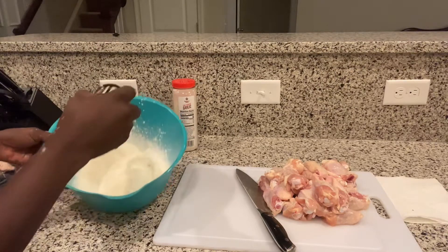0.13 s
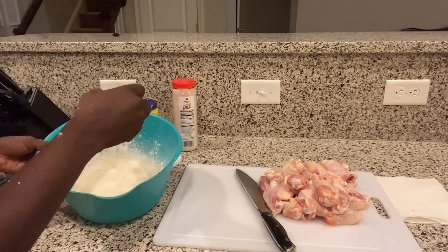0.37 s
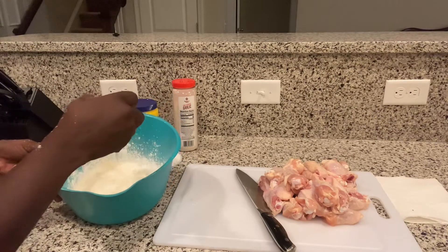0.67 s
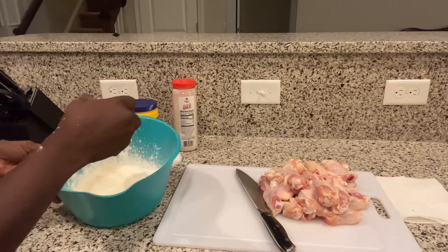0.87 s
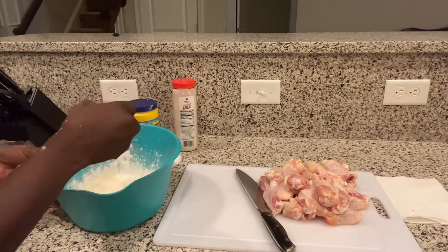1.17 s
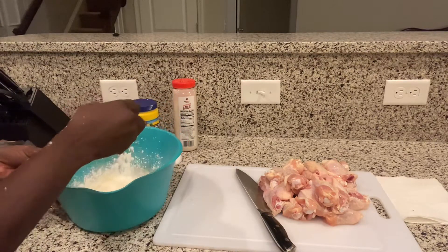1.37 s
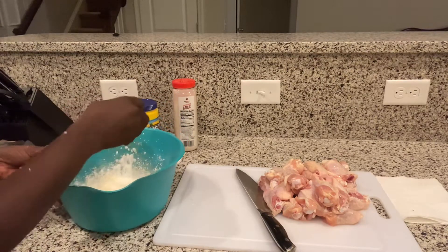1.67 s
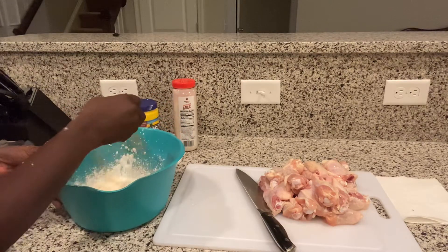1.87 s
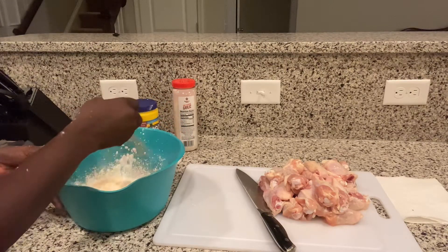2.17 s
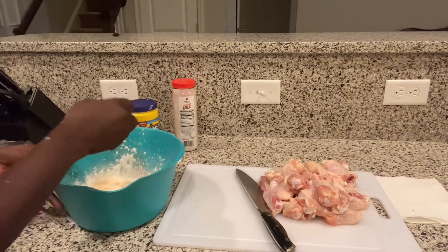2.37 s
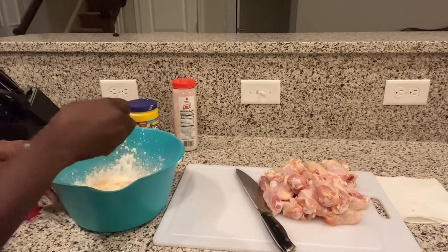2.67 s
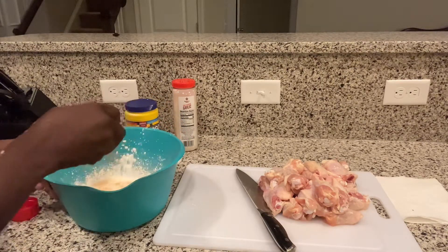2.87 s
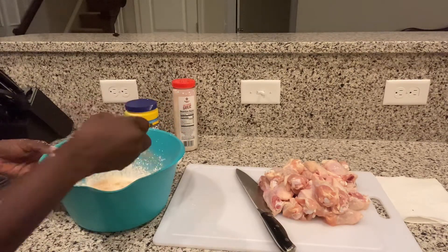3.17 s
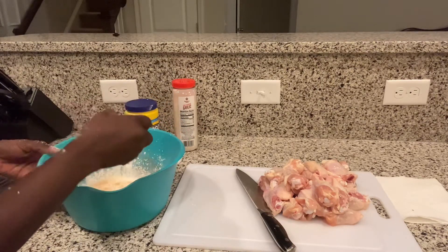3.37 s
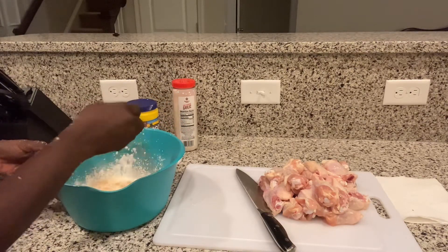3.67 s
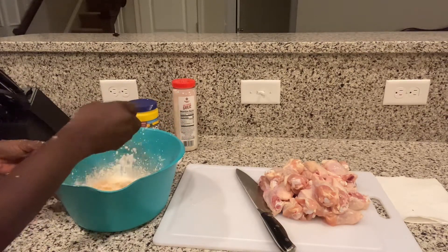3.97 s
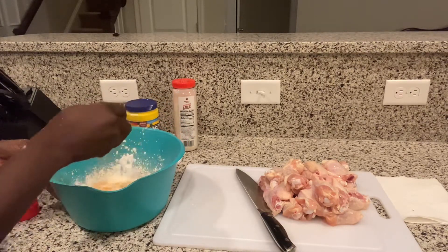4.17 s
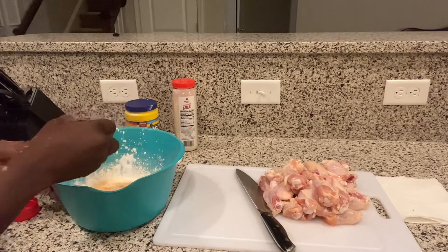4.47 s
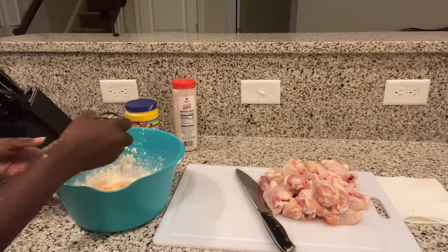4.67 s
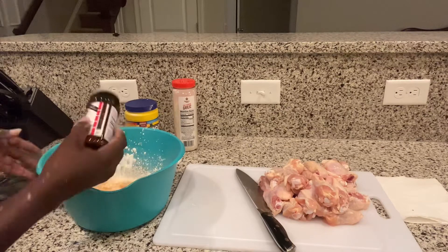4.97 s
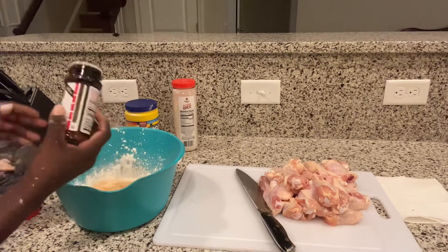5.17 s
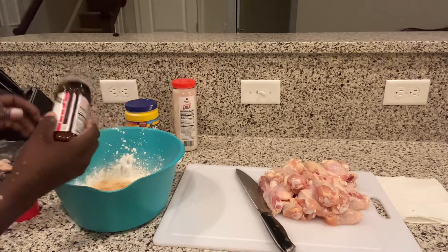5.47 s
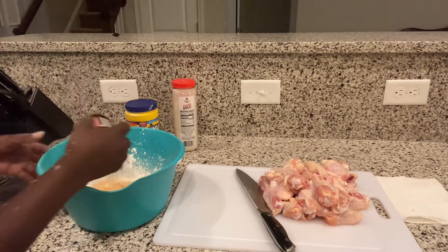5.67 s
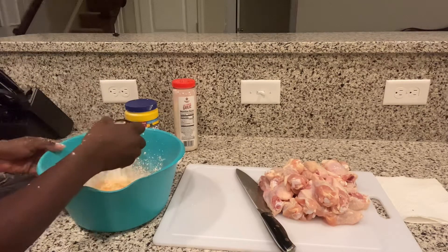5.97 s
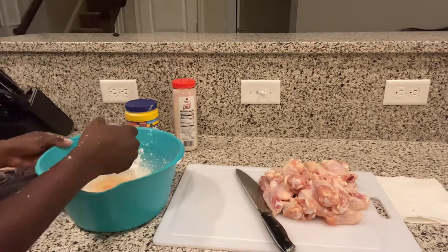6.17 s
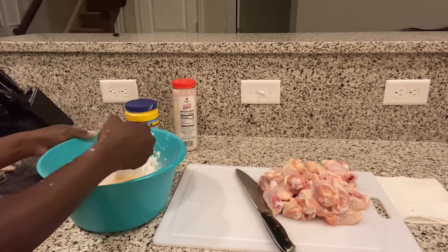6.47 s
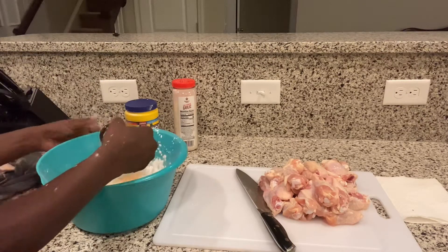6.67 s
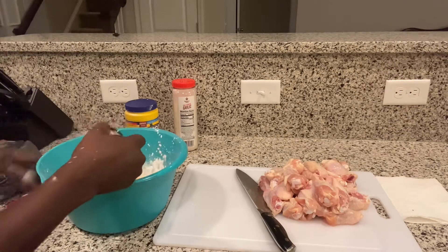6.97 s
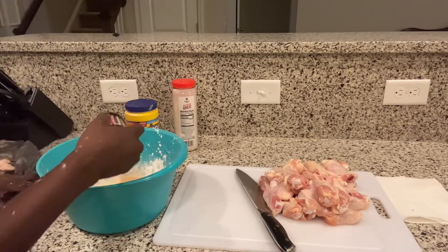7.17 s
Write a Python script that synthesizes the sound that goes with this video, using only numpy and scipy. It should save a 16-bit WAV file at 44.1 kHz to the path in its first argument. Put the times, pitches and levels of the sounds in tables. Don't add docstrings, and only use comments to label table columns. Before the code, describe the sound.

In a quiet kitchen with a low humming fan, a plastic bowl lands on a stone counter with a sharp hollow knock, rocks and skids to rest. Faint, dry shakes of seasoning follow, grains ticking on plastic and fizzing softly. Late on, the bowl is dragged in short scraping jerks, then a few more shakes. Close stereo microphone on the counter.

```python
import sys
import numpy as np
from scipy import signal
from scipy.fft import rfft, irfft, next_fast_len
from scipy.io import wavfile
from scipy.ndimage import uniform_filter1d

SR = 44100
rng = np.random.default_rng(int(sys.argv[2]) if len(sys.argv) > 2 else 0)


def dump(signal):
    limited = np.clip(np.atleast_2d(signal).T, -1, 1)
    pcm = np.round(limited * 32767).astype(np.int16)
    wavfile.write(sys.argv[1], SR, pcm)


def rack_gain(trim_db):
    fader = np.asarray(trim_db, float)
    return 10 ** (fader / 20)


N = 323329


def evened(x):
    return x / np.sqrt(np.mean(x ** 2) + 1e-20)


def smoothed(x, size):
    return uniform_filter1d(uniform_filter1d(x, size=size), size=size)


def read(points, hz):
    f, value = np.transpose(points)
    return np.interp(np.log(hz + 1), np.log(f + 1), value)


def peaks_db(modes, hz):
    return sum(db / (1 + (2 * (hz - f) / width) ** 2) for f, width, db in modes)


def port_gains(lead, balance, hz):
    half = np.exp(.5j * np.interp(hz, *np.transpose(lead))) * rack_gain(read(balance, hz) / 2)
    return np.array([half, 1 / half])


def ports(x, lead, balance):
    size = next_fast_len(N + 4096)
    hz = np.fft.rfftfreq(size, 1 / SR)
    return irfft(rfft(x, size) * port_gains(lead, balance, hz), size)[:, :N]


def resonate(x, hz, width):
    turn = np.exp(2j * np.pi * np.cumsum(hz * np.ones(len(x))) / SR)
    r = np.exp(-np.pi * width / SR)
    return 2 * (turn * signal.lfilter([(1 - r) ** 2], [1, -2 * r, r * r], x / turn)).real


def body(x, modes):
    return evened(sum((-1) ** k * rack_gain(db) * resonate(x, hz, w) for k, (hz, w, db) in enumerate(modes)))


def ringing(modes, t):
    return sum(rack_gain(db - 60 * t / t60) * np.sin(2 * np.pi * hz * t) for hz, db, t60 in modes)


def grains(per_s, spread_db):
    chance, size, sign = rng.random(N), rng.exponential(1, N), rng.choice([-1., 1.], N)
    return evened(sign * rack_gain(spread_db * np.minimum(size, 4)) * (chance < per_s / SR))


def strokes(rows, rise, fall):
    t = np.arange(0, N + 64, 32) / SR
    s, length, start_db, end_db = np.transpose(rows)[..., None]
    db = start_db + (end_db - start_db) * np.clip((t - s) / np.maximum(length, 1e-3), 0, 1)
    db -= rise * np.maximum(s - t, 0) + fall * np.maximum(t - s - length, 0)
    return np.interp(np.arange(N) / SR, t, rack_gain(db).sum(0))


# f/Hz, level/dB per Hz
FAN_SPECTRUM = [(25, -31), (88, -14.5), (146, -9), (211, -19), (276, -15), (553, -16.5), (894, -27),
                (2800, -50.5), (5000, -47.5), (8640, -52), (10300, -57), (12000, -61.5), (13650, -58.5),
                (13900, -75.5)]
# f/Hz, width/Hz, level/dB
ROOM_MODES = [(61.7, 31, 12.5), (122.15, 7.8, 11.5), (180.3, 68, 8.5), (201, 19, 5), (270.3, 63.4, 14),
              (369, 36, 8), (392.3, 12.8, 8), (913, 64, 5.5), (1216, 26, 12.5)]
# f/Hz, width/Hz, level/dB
HOUSING = (3460, 250, 8)
# f/Hz, likeness [0-1]
FAN_LIKENESS = [(30, 1), (140, 0.9), (300, 0.78), (700, 0.667), (1500, 0.39), (4000, 0.074), (8000, 0.14),
                (14000, 0.489)]
# f/Hz, lead/rad
FAN_LEAD = [(0, 0), (340, 0.8), (600, 2.6), (1030, 2.5), (1290, 3.2), (3450, -0.6), (3700, 0.3),
            (6630, 5.3), (8790, 6.8), (9820, 9.4), (10900, 9.4), (12200, 12.4), (13700, 12.6),
            (14500, 13.4)]
# f/Hz, left minus right/dB
FAN_BALANCE = [(60, 3), (180, -1), (540, -2), (1600, -0.5), (4780, 2), (14300, -1)]


def air():
    level_db, patchy_db = -51.5, 1.3
    frames, hz = N // 1024 + 5, np.fft.rfftfreq(4096, 1 / SR)
    a, b, c, d, patches = rng.standard_normal((frames, 2049, 5)).T
    patches = evened(uniform_filter1d(uniform_filter1d(patches, size=30, axis=0), size=4, axis=1))
    same = np.clip(read(FAN_LIKENESS, hz), 0, 1)[:, None]
    left = a + 1j * b
    right = same * left + np.sqrt(1 - same ** 2) * (c + 1j * d)
    colour_db = read(FAN_SPECTRUM, hz) + peaks_db(ROOM_MODES + [HOUSING], hz)
    z = np.array([left, right]) * port_gains(FAN_LEAD, FAN_BALANCE, hz)[..., None]
    z *= rack_gain(colour_db[:, None] + patchy_db * patches)
    return rack_gain(level_db) * evened(signal.istft(z, nperseg=4096, noverlap=3072)[1][:, :N])


# f/Hz, left lead/rad
MOTOR_LINES = [(140.1, 0.3), (280.2, 0.99)]
# t/s, level/dB
MOTOR_BEAT = [(0.35, -54), (0.46, -58), (1.13, -53), (1.24, -43), (1.42, -56.5), (3.48, -50), (3.59, -69),
              (3.73, -50.5), (3.87, -88), (3.97, -52), (5.64, -54.5), (5.73, -49.5), (6.14, -63.5),
              (6.63, -47.5), (6.77, -64.5), (7.21, -49.5), (7.33, -56)]
# f/Hz, level/dB, left lead/rad
WHINES = [(1120, -93, 2.5), (1238, -90, 3), (3305, -105, -.6), (3422, -102, -.6), (3541, -98, -.6),
          (3777, -105, -.6)]
# t/s, f/Hz, level/dB
MAIN_WHINE = [(0.4, 3481, -94), (1.0, 3481, -97), (1.6, 3481, -92), (2.1, 3481, -97), (3.2, 3481, -94),
              (4.15, 3481, -97), (4.75, 3481, -90), (5.7, 3481, -91), (6.1, 3481, -94), (6.9, 3481, -92),
              (7.3, 3481, -96)]


def hum():
    t = np.arange(N) / SR

    def drift():
        slow_hz = np.geomspace(.3, 5, 12)
        return evened(sum(np.sin(2 * np.pi * (f * t + rng.random())) / np.sqrt(f) for f in slow_hz))

    swell, waver = drift(), drift()
    turns = 2 * np.pi * np.cumsum(1 + 0.0011 * waver) / SR
    levels = [rack_gain(-51.5 + 0.26 * swell), rack_gain(-4.0 + np.interp(t, *np.transpose(MOTOR_BEAT)))]
    flutter_db = 3 * evened(smoothed(rng.standard_normal(N), 900))
    lines = [(hz, lead, level) for (hz, lead), level in zip(MOTOR_LINES, levels)]
    lines += [(hz, lead, rack_gain(db + flutter_db)) for hz, db, lead in WHINES]
    s, main_hz, main_db = np.transpose(MAIN_WHINE)
    lines.append((main_hz.mean(), -.6, rack_gain(np.interp(t, s, main_db) + flutter_db)))
    out = np.zeros((2, N))
    for hz, lead, level in lines:
        out += np.sqrt(2) * level * np.sin(hz * turns + np.array([[lead / 2], [-lead / 2]]))
    return out


# t/s, length/s, start level/dB, end level/dB, bright part above it/dB
DRAGS = [
    (0, 0.46, -80.5, -95.5, 7),
    (0.105, .013, -72, -62, 2.5),
    (0.158, 0.33, -55.5, -85, -6.5),
    (0.633, .38, -84.5, -70, -2),
    (1.017, 0.14, -82, -86, -4),
    (5.97, 0.26, -76, -72, 3.5),
    (6.232, 0.057, -67, -56.5, 2.5),
    (6.333, 0.13, -71, -65.5, 4),
    (6.476, 0.15, -68.5, -75.5, -2),
]
# f/Hz, width/Hz, level/dB
DRAG_LOW = [(1350, 530, 3.5), (1652, 260, 6.5), (2047, 280, 6.5), (2800, 676, -10.5)]
DRAG_HIGH = [(3330, 540, -4.5), (4200, 570, -2), (5280, 1300, -10), (6200, 850, -11), (7460, 490, -14)]


def drags():
    low, high = body(grains(5000, 5.9), DRAG_LOW), body(grains(5430, 1.9), DRAG_HIGH)
    slip_db = 0.51 * evened(smoothed(rng.standard_normal(N), 120))
    edges = 791.5, 329
    dull = strokes([row[:4] for row in DRAGS], *edges)
    bright_rows = [(s, length, a + up_db - 6.0, b + up_db - 5.5) for s, length, a, b, up_db in DRAGS]
    return rack_gain(slip_db) * (dull * low + strokes(bright_rows, *edges) * high)


# t/s, length/s, start level/dB, end level/dB
POURS = [(.04, 0.048, -93, -67), (.13, 0.2, -66, -72), (.5, 0.13, -94, -76), (.7, 0.072, -71, -74.5),
         (.83, 0.031, -75, -71), (.902, 0.14, -65, -86.5), (1.126, 0.098, -82, -85),
         (1.28, 0.24, -76.5, -79.5), (1.56, .11, -90, -73.5), (1.7, 0.38, -93.5, -83.5),
         (2.25, 0.27, -80, -72), (2.9, 0.2, -71.5, -74.5), (3.16, 0.042, -88, -74.5),
         (3.5, 0.042, -78, -83), (3.6, 0.12, -76, -82.5), (3.914, 0.26, -76, -102),
         (4.64, 0.26, -80.5, -81), (4.965, 0.18, -72, -66), (5.6, 0.039, -91, -76.5),
         (5.74, 0.034, -80, -86.5), (5.83, 0.059, -78.5, -80.5), (6.004, 0.2, -85, -75),
         (6.22, 0.081, -68.5, -63), (6.357, 0.14, -72, -65), (6.6, 0.032, -85, -76),
         (6.74, 0.16, -77.5, -71), (6.998, 0.44, -77, -81)]
# f/Hz, level/dB per Hz
FIZZ = [(2350, -31), (4000, -13), (5500, -3.5), (6500, -5), (7500, -10.5), (9070, -16), (10300, -15),
        (12500, -26.5), (14400, -26), (15000, -38.5)]


def sprinkle():
    rise, pour_fall, puff_fall = 900, 329.5, 211
    puff_s = 0.025
    hz, _, z = signal.stft(grains(16000, 4.7), SR, nperseg=256)
    patches = rng.standard_normal(z.shape[::-1]).T
    patches = evened(uniform_filter1d(uniform_filter1d(patches, size=6, axis=0), size=10, axis=1))
    fizz = signal.istft(z * rack_gain(read(FIZZ, hz)[:, None] + 4.7 * patches), SR, nperseg=256)[1][:N]
    puffs = [(s, puff_s, db + bright_db - 18.5, db + bright_db - 16) for s, db, bright_db, *_ in SHAKES]
    return evened(fizz) * (strokes(POURS, rise, pour_fall) + strokes(puffs, rise, puff_fall))


# t/s, blow level/dB, contact/ms, crack level/dB
SET_DOWN = [
    (0.1143, -24.5, 0.15, -29),
    (0.11512, -19, 0.32, -32),
    (.11564, -19, .35, -35),
    (0.11695, -12, 1.14, -33),
]
# t/s, blow level/dB
BOUNCES = [
    (0.1282, -33.5),
    (0.1494, -26),
    (0.164, -32),
    (0.177, -27.5),
    (0.205, -43),
]
# f/Hz, level/dB, t60/s
BOWL = [(384, -1.5, 0.08), (490, -5, 0.074), (325, -11, .07), (1661, -4, 0.026), (752, -8, 0.05),
        (879, -12, 0.05), (1352, -24, 0.05), (1964, -20, .02), (2157, -16, 0.032), (2496, -7, 0.04),
        (2903, -10.5, 0.033), (3250, -16, 0.016), (4110, -9, 0.016), (4975, -14, 0.015)]
RIM = [(1625, -43, 0.63), (1700, -48, .5), (1310, -49.5, 0.302), (2040, -41, .3), (2400, -47.5, .35),
       (3640, -20.5, .02), (4410, -22.5, 0.018)]
COUNTER = [(75.6, -36.5, 0.57), (111.4, -39.5, 0.67), (180, -40, .3), (297, -43, 0.1494), (340, -31.5, .2),
           (393, -27.5, 0.29), (527.5, -38.5, 0.45), (909, -37, .22), (1310, -42.5, 0.2116)]


def set_down():
    t, long_t, u = np.arange(SR // 8) / SR, np.arange(SR // 2) / SR, np.arange(400) / SR
    blows, cracks, rocking = np.zeros(N), np.zeros(N), np.zeros(N)
    for s, blow_db, ms, crack_db in SET_DOWN:
        at = round(s * SR)
        blows[at:at + 400] += rack_gain(blow_db) * np.sin(np.pi * np.minimum(u / ms * 1000, 1)) / (ms * SR / 1500)
        cracks[at:at + 400] += rack_gain(crack_db) * rng.standard_normal(400) * np.exp(-u / 0.00098)
    for s, blow_db in BOUNCES:
        rocking[round(s * SR):][:50] += rack_gain(blow_db) * np.hanning(50) / 30
    wall = -ringing(BOWL, t)
    palm = np.clip((0.1262 - np.arange(N) / SR) / .003, .1, 1)
    bowl = signal.oaconvolve(blows, wall)[:N] * palm
    bowl += signal.oaconvolve(rocking, wall * rack_gain(-898 * t))[:N]
    bowl += signal.lfilter(*signal.butter(3, 6800, fs=SR), cracks)
    bowl = signal.lfilter(*signal.butter(3, 185, "high", fs=SR), bowl)
    slab = ringing(COUNTER, long_t) * (1 - np.exp(-long_t / 0.013))
    return bowl + signal.oaconvolve(blows, ringing(RIM, long_t) + slab)[:N]


# f/Hz, t60/s
KITCHEN = [(150, 0.98), (350, 0.44), (700, 0.68), (1500, 0.44), (4000, 0.36), (10000, 0.32)]


def kitchen(x, gap_s):
    taps = np.zeros((2, SR))
    at = np.arange(0, SR - 20, 20) + rng.integers(0, 20, (2, (SR - 1) // 20))
    np.put_along_axis(taps, at, rng.choice([-1., 1.], at.shape), 1)
    taps[1] = 0.21 * taps[0] + 0.91 * taps[1]
    hz, t, z = signal.stft(taps, SR, nperseg=256)
    tail = signal.istft(z * rack_gain(-60 * t / read(KITCHEN, hz)[:, None]), SR, nperseg=256)[1]
    tail *= np.clip((np.arange(tail.shape[1]) / SR - gap_s) / 0.00053, 0, 1)
    return signal.fftconvolve(x[None], tail / np.linalg.norm(tail[0]), axes=1)[:, :N]


# t/s, peak level/dB, f/Hz, length/ms
TICKS = [(0.166, -51, 6500, 4), (0.281, -51, 1620, 6.4), (0.3018, -52, 1700, 5.4),
         (0.9083, -57, 3500, 0.62), (0.967, -61, 1650, 3.3), (1.376, -61.5, 2310, 1.4),
         (2.876, -68, 2120, 8.6), (3.158, -76, 2300, 4), (7.028, -62, 7350, 2), (6.235, -55, 4000, 3.2),
         (6.267, -55, 1590, 9), (6.282, -53, 1500, 6.7), (6.566, -56, 2500, 2.2), (6.387, -58, 3000, 1.8),
         (6.411, -55, 3200, 2.4), (2.757, -68, 1960, 22), (2.89, -65, 2050, 33), (6.2955, -54, 2200, 3.3),
         (6.298, -48, 1480, 13), (6.312, -56, 1680, 4.3), (6.357, -53, 2500, 2.2),
         (6.393, -48.5, 4500, 3.2), (6.421, -48, 3000, 1.7), (6.468, -48, 2320, 3.8), (6.485, -44, 2800, 2),
         (6.519, -54, 2500, 1.8), (6.605, -69, 6000, 8.7),
         (0.903, -48, 5500, 0.98), (0.9067, -43, 6100, 1), (0.9095, -54, 5000, 2), (0.907, -52, 1540, 4.8),
         (0.933, -54.5, 5500, 2.5), (0.968, -61, 5500, 5.9), (0.9755, -52, 6500, 1.4),
         (0.9861, -47.5, 6100, 1.8), (0.9897, -55, 3000, 1.3), (0.9935, -59, 7000, 3),
         (0.987, -54, 1590, 4), (1.029, -63, 4200, 7.2), (1.955, -80.5, 6000, 2), (2.371, -63, 7300, 26),
         (3.072, -63, 7140, 18), (3.488, -62.5, 6500, 5.5), (4.306, -64.5, 6730, 4.6),
         (4.494, -64.5, 7140, 4.9), (5.954, -52, 1530, 3.8), (6.061, -59, 1800, 5.9),
         (6.169, -59, 6600, 8.1), (6.279, -51, 6500, 10), (6.288, -53.5, 2680, 48),
         (6.305, -55.5, 5950, 27), (6.356, -53, 5560, 2.2), (6.497, -50, 1740, 6.9),
         (6.858, -59.5, 7040, 4.5), (7.071, -55, 5470, 1.3), (7.073, -59, 1080, 7.1), (7.121, -63, 7200, 9),
         (7.149, -68, 7050, 18), (7.12, -60, 1160, 24)]
# t/s, peak level/dB, length/ms, f/Hz
SLIPS = [
    (6.356, -50.5, 11, 5900),
    (6.376, -52.5, 22, 4500),
    (6.4025, -47.5, 18, 4600),
    (6.4424, -51.5, 13, 4300),
    (6.4539, -48, 23, 4500),
    (6.479, -48, 11, 4400),
    (6.494, -55, 9, 4000),
    (6.503, -48.5, 7, 4500),
    (6.518, -54, 5, 4200),
    (6.553, -54, 10, 4170),
]


def ticks():
    out, t = np.zeros(N), np.arange(1800) / SR
    tick_end, slip_end = 2, 6.3
    rows = [(s, db, hz, hz * (0.21 + 0.85 / ms), ms, tick_end) for s, db, hz, ms in TICKS]
    rows += [(s, db, hz, 2200, ms, slip_end) for s, db, ms, hz in SLIPS]
    chance = rng.standard_normal((len(rows), 2, 1800))
    for (s, db, hz, width, ms, end), (noise, size) in zip(rows, chance):
        snap_db = 5 * np.exp(-1000 * t / .5)
        grit = noise * rack_gain(5.5 * size + snap_db) * np.exp(-(1000 * t / ms) ** end)
        tick = resonate(grit, hz, width)
        loudness = np.sqrt((tick ** 2).sum() / (ms * SR / 1600))
        out[round(s * SR):][:1800] += rack_gain(db - 6.5) * tick / loudness
    return signal.lfilter(*signal.butter(2, 14000, fs=SR), out)


# t/s, peak level/dB, bright part above it/dB, wall f/Hz, fall/ms
SHAKES = [(0.699, -77, -9, 1540, 52), (0.7472, -62.5, -4, 1350, 28), (0.8294, -69, -5.5, 1440, 52),
          (0.9494, -73, 12.5, 1590, 77), (1.0251, -71.5, 10, 1580, 44), (1.1194, -71.5, 7.5, 2040, 32),
          (1.188, -78, 13.5, 1440, 48), (1.2694, -79, 8.5, 1470, 42), (1.3986, -71, -3, 1580, 70),
          (1.559, -76.5, 14, 1510, 58), (1.729, -65.5, 4.5, 1360, 56), (1.837, -65.5, 3, 1520, 59),
          (2.1594, -80.5, 11.5, 1350, 47), (2.2634, -90, 3, 1406, 52), (2.446, -59.5, 4, 1380, 57),
          (2.597, -67, 9, 1560, 70), (2.749, -64.5, 6, 1850, 38), (2.8737, -59.5, 2.5, 2000, 38),
          (2.9811, -72.5, 4, 1620, 28), (3.151, -56, -4.5, 2140, 62), (3.3094, -76, 11.5, 2394, 47),
          (3.759, -68.5, 6.5, 1660, 55), (4.35, -70.5, 9.5, 1670, 59), (4.4894, -70, 2.5, 2450, 46),
          (4.6184, -71.5, -9, 1900, 63), (5.455, -84, 20.5, 1550, 24), (6.83, -68.5, 1, 1880, 100),
          (6.9905, -62.5, -2, 2090, 52), (7.0718, -70, 3, 1750, 82), (7.275, -67.5, 2, 1796, 59)]
# f/Hz, width/Hz, level/dB
JAR_LOW = [(1500, 1130, -6), (2144, 670, -5.5), (2680, 130, -5.5)]
JAR_HIGH = [(3640, 650, -2.5), (4200, 380, -2), (5370, 2000, 3.5), (6500, 6500, -7), (8250, 1600, -14)]


def shakes():
    t, low, high = np.arange(N) / SR, np.zeros(N), np.zeros(N)
    u, rise_s = t[:SR // 5], 0.0058
    for s, db, bright_db, _, fall_ms in SHAKES:
        fall = np.exp(-(1000 * np.maximum(u - rise_s, 0) / fall_ms) ** 2.6)
        clump = np.clip(u / rise_s, 0, 1) * fall
        at = round((s - .002) * SR)
        part = clump[:N - at] * rack_gain(db - 10.5)
        low[at:at + len(part)] += part
        high[at:at + len(part)] += part * rack_gain(bright_db)
    s, *_, spot, _ = np.transpose(SHAKES)
    spot_hz = spot[np.maximum(np.searchsorted(s - .005, t) - 1, 0)]
    drive = grains(5300, 5.2)
    wall = 0.73 * body(drive, JAR_LOW) + 0.58 * evened(resonate(drive, spot_hz, 550))
    return low * wall + high * body(grains(9000, 3.5), JAR_HIGH)


def curves(rows):
    s, db, *rest = np.transpose(rows)
    t = np.arange(N) / SR
    level = rack_gain(np.interp(t, s, db)) * np.clip(np.minimum(t - s[0], s[-1] - t) / 0.01, 0, 1)
    return [level] + [np.interp(t, s, c) for c in rest]


# t/s, level/dB, cavity f/Hz
SLIDE = [(4.32, -97, 3100), (4.42, -79.5, 3330), (4.48, -78, 3480), (4.55, -85, 3600), (4.64, -80, 3920),
         (4.73, -82, 3770), (4.88, -82, 3800), (5.0, -84, 3920), (5.08, -106, 4150), (5.15, -89.5, 4600),
         (5.22, -99, 4900)]


def slide():
    level, hz = curves(SLIDE)
    drive, width_hz = grains(7600, 1.7), 360
    cavity = evened(resonate(drive, hz, width_hz)) + 0.59 * evened(resonate(drive, 1.24 * hz, width_hz))
    wall = 0.71 * body(drive, JAR_LOW) + 0.58 * body(drive, JAR_HIGH)
    return level * (cavity + wall)


# f/Hz, lead/rad
HAND_LEAD = [(0, 0), (780, 2.8), (1460, 0.7), (3100, 0.2), (4480, 1.2), (5080, 0.8), (6030, 1.5),
             (7240, -0.9), (8790, 0.6), (9730, 3.0), (11300, 3.3), (12200, 6.3), (14000, 6.3), (14500, 7.8)]
# f/Hz, left minus right/dB
HAND_BALANCE = [(60, -3), (240, 10), (930, -8), (3640, -3), (14300, 4)]
# f/Hz, left lead/rad; f/Hz, left minus right/dB
KNOCK_LEAD = [(0, 0), (260, .2), (390, .7), (550, 1.0), (800, 1.5), (1300, .2), (1650, .3), (2200, 1.1),
              (5000, 1.2), (6700, 1.6), (8000, .6), (10300, 2.1), (13000, .9)]
KNOCK_BALANCE = [(260, 1.5), (390, -4), (550, -1), (800, 8), (1300, 0), (2200, -1), (7000, -4)]
# f/Hz, width/Hz, level/dB
AIMED = [(395, 70, -5.5), (747, 160, -11), (1480, 149.5, -8), (1680, 180, -5), (2170, 130, -7.5),
         (2538, 202, -2)]


def scene():
    knock = set_down()
    jar = shakes() + sprinkle() + slide()
    bowl = drags() + ticks()
    hz = np.fft.rfftfreq(N, 1 / SR)
    spread = np.fft.irfft(np.fft.rfft(knock) * rack_gain(-7.5 + peaks_db(AIMED, hz)), N)
    wet = kitchen(spread + rack_gain(-10) * (jar + bowl), gap_s=0.0065)
    near = ports(jar, FAN_LEAD, HAND_BALANCE) + ports(bowl, HAND_LEAD, HAND_BALANCE)
    return near + ports(knock, KNOCK_LEAD, KNOCK_BALANCE) + wet + air() + hum()


def dip(hz, edges, db):
    return rack_gain(db * np.clip(np.minimum(hz - edges[0], edges[1] - hz) / 200 + .5, 0, 1))


def low_pass(x):
    return signal.sosfilt(signal.butter(12, 14880, fs=SR, output="sos"), x)


def record(dry):
    size = next_fast_len(N)
    hz = np.fft.rfftfreq(size, 1 / SR)
    left, right = rfft(dry, size)
    mid = (left + right) / 2 * dip(hz, (9750, 11000), -6.0)
    side = (left - right) / 2 * dip(hz, (12350, 13600), -2.5) * dip(hz, (7800, 8550), -9)
    mix = irfft(np.array([mid + side, mid - side]), size)[:, :N]
    return low_pass(mix)


dry = scene()
out = record(dry)
dump(out)
```